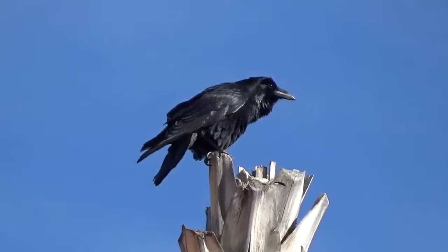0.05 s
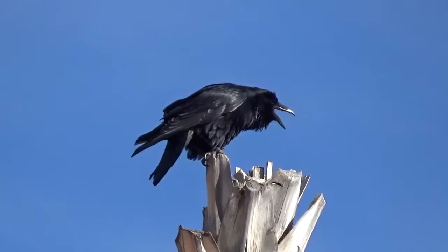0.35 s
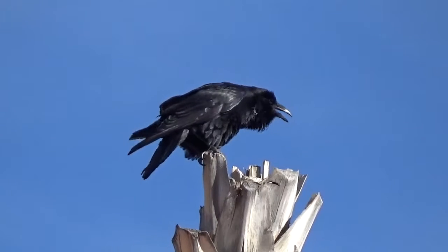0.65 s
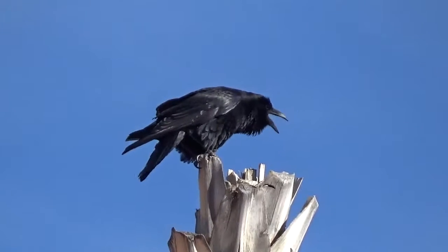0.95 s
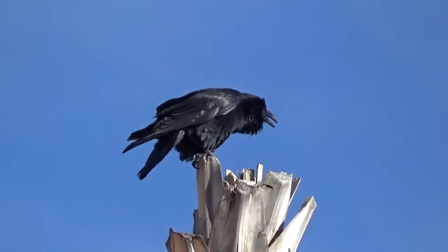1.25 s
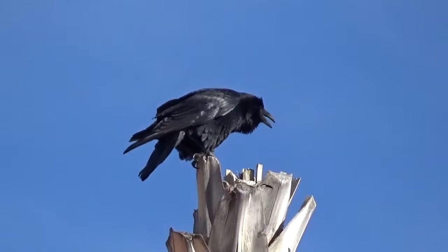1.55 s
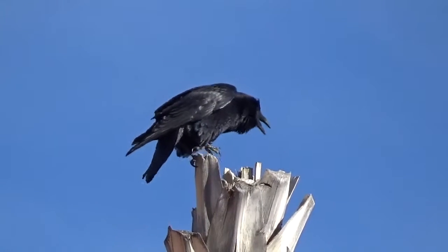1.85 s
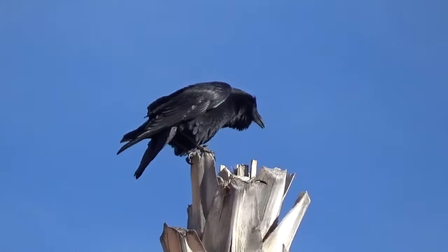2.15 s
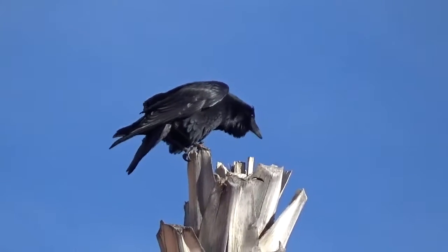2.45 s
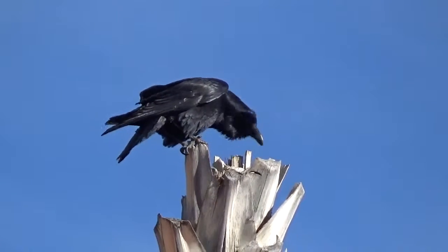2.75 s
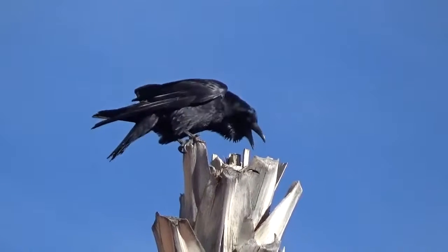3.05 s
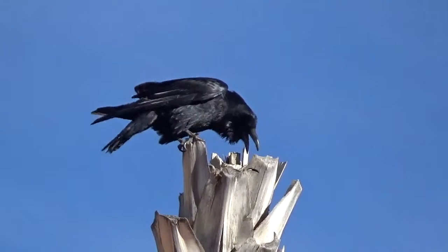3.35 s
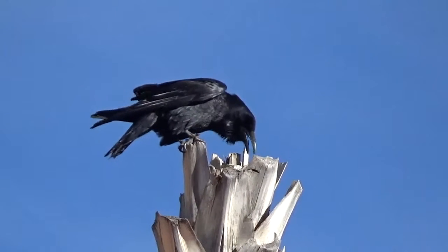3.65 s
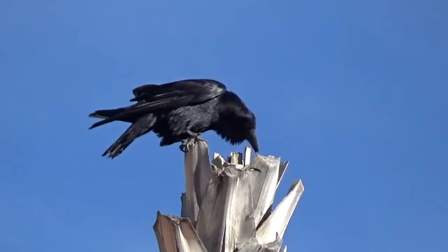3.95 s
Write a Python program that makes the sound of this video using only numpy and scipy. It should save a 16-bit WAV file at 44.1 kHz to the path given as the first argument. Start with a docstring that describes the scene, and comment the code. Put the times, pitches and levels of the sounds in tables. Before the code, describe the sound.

Five raspy raven croaks in the open air, with wind rumbling softly on the microphone.

```python
"""Raven on a palm stump

Open air, with the microphone near a raven that gives five harsh croaks, faint echoes behind them.
Each croak is a slowing rattle of bursts, each burst a few voice pulses ringing in throat and beak.
Wind rumbles and thumps on the microphone, an engine hums far off, and three small dry clicks sound."""
import sys
import numpy as np
from scipy import signal
from scipy.fft import rfft, irfft
from scipy.io import wavfile

SR = 44100
rng = np.random.default_rng(int(sys.argv[2]) if len(sys.argv) > 2 else 0)


def store_pcm(level_fs):
    """Save levels as 16-bit WAV."""
    pcm = np.round(np.clip(level_fs, -1, 1) * 32767).astype(np.int16)
    wavfile.write(sys.argv[1], SR, np.atleast_2d(pcm).T)


N = 176400
T = np.arange(N) / SR


def from_db(db):
    """Decibels to gain."""
    return 10 ** (np.asarray(db) / 20)


def rms_one(x):
    """Scale to unit power."""
    return x / np.sqrt(np.mean(x ** 2) + 1e-20)


def read(rows, at):
    """Columns of a table, joined by straight lines."""
    key, *columns = np.transpose(rows)
    return [np.interp(at, key, c) for c in columns]


def at_hz(points, hz):
    """A curve read on a log-frequency axis."""
    knots_hz, values = np.transpose(points)
    return np.interp(np.log(hz + 1), np.log(knots_hz), values)


def pan(db):
    """Left and right gains, the left louder by db."""
    return from_db(np.array([[db], [-db]]) / 2)


def cut(x, hz, kind, order=2):
    """Butterworth filter."""
    return signal.sosfilt(signal.butter(order, hz, kind, fs=SR, output="sos"), x + 1e-18)


def drift(rate_hz):
    """A slow random wander."""
    knots = rng.standard_normal(400)
    return np.interp(T * rate_hz, np.arange(len(knots)), knots)


def resonate(x, table):
    """Parallel resonances of alternating sign."""
    out = 0
    for k, (hz, width, db) in enumerate(table):
        r = np.exp(-np.pi * width / SR)
        poles = [1, -2 * r * np.cos(2 * np.pi * hz / SR), r * r]
        ring = (1 - r * r) / 2 * signal.lfilter([1, 0, -1], poles, x + 1e-18)
        out = out + (-1) ** k * from_db(db) * ring
    return out


def impulses(rows):
    """One impulse for each (time [s], level [dB]) row."""
    out = np.zeros(N)
    for s, db in rows:
        out[int(s * SR)] = from_db(db)
    return out


def puffs(triggers, decay_s):
    """Each impulse releases a dying puff of noise."""
    envelope = signal.lfilter([1], [1, -np.exp(-1 / (decay_s * SR))], triggers + 1e-18)
    return envelope * rng.standard_normal(N)


# likeness of left and right at the microphone: (frequency [Hz], correlation [0-1])
LIKENESS = [(40, 1), (130, .95), (280, 0.9), (1000, .97), (4000, .92), (10000, 0.8)]

def stereo_noise(spectrum):
    """Coloured noise of unit power, nearly alike in both channels."""
    hz = np.arange(N // 2 + 1) * SR / N
    mid, side = rfft(rng.standard_normal((2, N)))
    alike = np.clip(at_hz(LIKENESS, hz), 0, 1)
    channels = np.sqrt(1 + alike) * mid + np.sqrt(1 - alike) * side * [[1], [-1]]
    return rms_one(irfft(from_db(at_hz(spectrum, hz)) * channels, N))


# gusts at the microphone: (time [s], relative level [dB])
GUSTS = [(0.0, -41.5), (0.22, -38.5), (0.52, -47), (0.59, -40), (0.66, -47.5), (0.86, -36.5), (0.89, -50.5),
         (1.26, -45.5), (1.44, -43), (2.14, -45), (2.37, -38.5), (2.63, -53.5), (2.78, -49), (2.85, -51.5),
         (3.94, -47), (4.0, -43.5)]
# colour of their rumble: (frequency [Hz], relative density [dB])
RUMBLE = [(20, -17), (45, -7.5), (80, 0), (140, -1.5), (200, -4), (280, -7.5), (400, -21), (800, -33),
          (2000, -70)]
# buffets right on the microphone: (time [s], level [dB], frequency [Hz])
THUMPS = [(.141, -24, 55.4), (0.254, -19, 90), (0.575, -23.5, 110), (.596, -25.5, 120),
          (.844, -18.5, 115.5), (2.300, -22.5, 87), (2.373, -26, 139), (2.696, -26.5, 117),
          (2.779, -26, 131)]

def wind(rumble_db=4.5, rise_cycles=0.47):
    """Wind on the microphone: a gusting rumble with single low thumps."""
    gust_db, = read(GUSTS, T)
    out = from_db(gust_db + rumble_db + 1.8 * drift(14)) * stereo_noise(RUMBLE)
    for s, db, hz in THUMPS:
        cycles = np.maximum(T - s, 0) * hz
        swell = cycles / rise_cycles
        envelope = (swell * np.exp(1 - np.minimum(swell, 50))) ** 2
        out = out + from_db(db) * envelope * np.sin(2 * np.pi * cycles)
    return out * pan(-1.6)


# engine in the distance: (time [s], pitch [Hz], fundamental [dB], octave [dB])
ENGINE_HUM = [(0, 107.1, -36.5, -50.5), (.35, 110, -51, -40), (.6, 110.3, -42.5, -44),
              (1.05, 109.1, -41, -49), (1.4, 108.7, -34, -45.5), (1.8, 109, -37.5, -39.5),
              (2.15, 110, -44.5, -52), (2.6, 106.8, -57, -59.5), (2.95, 108.1, -43, -53),
              (3.5, 107, -39.5, -45), (4, 107.5, -45, -41)]

def engine(waver_db=1.5):
    """A far engine, a little to the right, drones on a wavering fundamental and its octave."""
    hz, *levels_db = read(ENGINE_HUM, T)
    phase = 2 * np.pi * np.cumsum(hz + 0.59 * drift(9.02)) / SR
    hum = sum(from_db(db + waver_db * drift(11)) * np.sin(k * phase) for k, db in enumerate(levels_db, 1))
    return np.sqrt(2) * pan(-2) * hum


# distant background of the place: (frequency [Hz], relative density [dB])
AIR = [(30, -4), (100, -1), (250, -2), (450, -1.5), (700, -8), (1000, -5), (1500, -14.5), (2500, -22),
       (5000, -22), (10500, -26.5)]

def distant_air():
    """A faint, steady wash from far away."""
    return from_db(-49) * stereo_noise(AIR)


# clicks near the microphone: (time [s], trigger level [dB])
CLICKS = [(.1291, -39.5), (2.1809, -36.5), (2.5646, -39)]
# their resonances: (frequency [Hz], width [Hz], gain [dB])
CLICK_BODY = [(2490, 500, 2.5), (3300, 320, 2), (5340, 930, 3), (8500, 2700, -6)]

def dry_clicks():
    """Three tiny puffs of noise, each ringing briefly."""
    return resonate(puffs(impulses(CLICKS), decay_s=0.0033), CLICK_BODY)


def scatter(db, t60_s):
    """A dying spray of reflections."""
    white = stereo_noise([(20, 0), (20000, 0)])
    decay = from_db(-60 * T / t60_s)
    return from_db(db) * rms_one(decay * white) / np.sqrt(N)


# echoes reaching the microphone from the surroundings: (delay [s], level [dB])
ECHOES = [(.0068, -18.5), (.024, -39), (.062, -21.5), (.098, -24), (.124, -19)]

def outdoors(x):
    """Bright scatter off the stump and nearby ground; dull echoes and a thin tail from farther out."""
    far = cut(scatter(-9, t60_s=0.64) + impulses(ECHOES), 3040, "low")
    near = scatter(-12.5, t60_s=0.16)
    return signal.fftconvolve(x[None], far + near, axes=1)[:, :N]


# resonances of throat and beak, in six bands from low to high: (frequency [Hz], width [Hz], gain [dB])
CHEST = [(472, 72, -4)]
LOW = [(1079, 229, 0.5)]
THROAT = [(1438, 252, 5.5), (2004, 267, -3), (2385, 200, -11)]
BEAK = [(3383, 280, -6.5), (4220, 800, -15.5)]
TREBLE = [(5810, 640, -15.5), (6900, 790, -19)]
TOP = [(8300, 680, -23.5), (10010, 470, -27)]

def throat(pulses, rasp, chest_db, low_db, beak_db, treble_db, top_db):
    """Voice pulses and their noisy rasp ring in the throat and beak."""
    bands = [(CHEST, chest_db), (LOW, low_db), (THROAT, 0),
             (BEAK, beak_db), (TREBLE, treble_db), (TOP, top_db)]
    resonances = [(hz, width, db + lift) for band, lift in bands for hz, width, db in band]
    source = pulses + from_db(-11.5) * puffs(rasp, decay_s=0.0015)
    return from_db(-4.5) * cut(resonate(source, resonances), 390, "high", order=3)


# catches of the voice just before the croaks: (time [s], pulse level [dB])
CATCHES = [(.391, -4), (1.012, -9), (1.047, -4), (1.780, -6), (1.791, -10), (3.047, -6), (3.082, -4),
           (3.461, -7), (3.474, -1.5), (3.489, -0.5)]

def catches(pitch_hz=493, second_db=-7.5):
    """The voice catches softly: two pulses, the second weaker."""
    second_pulses = [(s + 1 / pitch_hz, db + second_db) for s, db in CATCHES]
    pulses = impulses(CATCHES) + impulses(second_pulses)
    return throat(pulses, pulses * .5, chest_db=3, low_db=8.5, beak_db=-1, treble_db=2, top_db=-17)


# croaks from the stump: (start [s], bursts [count], first gap [s], gap growth [s per burst],
# pitch [Hz], pulse level [dB], openness [factor], harshness [factor], closing pitch drop [share],
# then the lifts of the chest, low, beak, treble and top bands [dB])
CROAKS = [(.4040, 10, 0.014, 0.0012, 480, 2.9, 0.95, 0.99, .12, 3.5, 3, -2, -3, -12),
          (1.0580, 9, 0.014, .00046, 498, 5.76, 0.84, 1.17, 0.12, -1, 1.5, 1.5, -0.5, -2),
          (1.8156, 10, 0.014, 0.0017, 498.2, 2.85, 0.95, 0.6, 0.056, 2, 2, 3, -1, -2),
          (3.0944, 10, .0146, .00100, 480, 3.75, 1.0, 0.95, .05, 2, 1.5, 1, 4, 3),
          (3.5033, 9, 0.015, 0.00085, 507.8, 2.8, 1.07, 1.1, .13, 5, 5, 3.5, 7, 7.5)]
# base course of every croak:
# (progress [0-1], open part of the gap [share], level [dB], pitch [ratio], roughness [0-1])
COURSE = [(0, 0.089, 1.5, 1.0, 0.54), (.25, 0.3, 0.5, .975, 0.29), (.5, 0.6, 2, .995, 0.12),
          (.75, 0.69, 2.5, 1.008, 0.1), (.88, 0.58, 2, 1.0, 0.2), (1, 0.42, -1.5, 1.0, 0.4)]
DROP_FROM, BURST_DROOP = .72, 0.018  # progress where the pitch starts to fall; share lost in a burst
JITTER, SHIMMER_DB = .09, 1.5  # spread of pulse period and level at roughness 1
SWELL_S, SWELL_DB = 0.0025, -2  # long bursts swell from a softer first pulse
BURST_SAG_DB, CLOSE_S = 0.5, 0.0033

def croak(start, bursts, first_gap, growth, hz, db, openness, harshness, drop, *lifts_db):
    """The syrinx opens in ever slower bursts and buzzes while open; the pitch falls at the end."""
    pulses, rasp = np.zeros((2, N))
    chance = rng.standard_normal((12, 2, 14))  # burst, timing or strength, pulse
    for k in range(bursts):
        gap = first_gap + growth * k
        progress = k / (bursts - 1)
        share, course_db, ratio, rough = read(COURSE, progress)
        rough = rough * harshness
        timing, strength = chance[k]
        open_s = gap * share * openness
        through = np.minimum(np.arange(len(timing)) / hz / open_s, 1)
        closing_fall = drop * max(progress - DROP_FROM, 0) / (1 - DROP_FROM)
        fall = closing_fall + BURST_DROOP * (through - .5)
        periods = (1 + JITTER * rough * timing) / (hz * ratio * (1 - fall))
        age = np.cumsum(periods) - periods[0]
        shape_db = SWELL_DB * share * np.exp(-age / SWELL_S) - BURST_SAG_DB * through
        gate = np.clip((open_s - age) / CLOSE_S + .5, 0, 1)
        size = from_db(db + course_db + SHIMMER_DB * rough * strength + shape_db) * gate
        at = ((start + age) * SR).astype(int)
        pulses[at] += size
        rasp[at] += size * np.sqrt(rough)
        start += gap
    return throat(pulses, rasp, *lifts_db)


def scene():
    """The raven just left of centre, with its echoes, over wind, engine and distant air."""
    raven = sum(croak(*row) for row in CROAKS) + catches()
    near = raven + dry_clicks()
    return near * pan(1) + outdoors(near) + wind() + engine() + distant_air()


def record(dry):
    """The microphone signal is cut steeply above 11.1 kHz."""
    return signal.sosfilt(signal.ellip(10, .2, 80, 11100, fs=SR, output="sos"), dry)


dry = scene()
out = record(dry)
store_pcm(out)
```